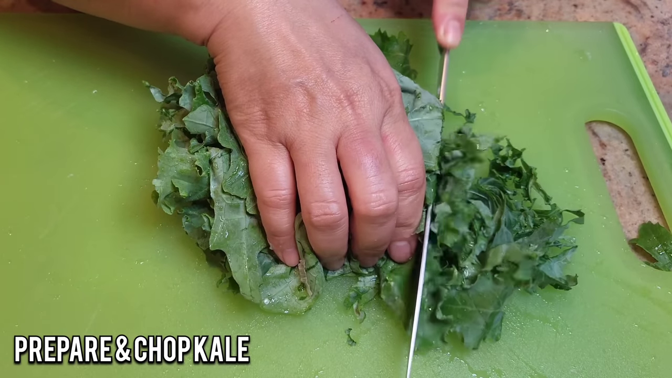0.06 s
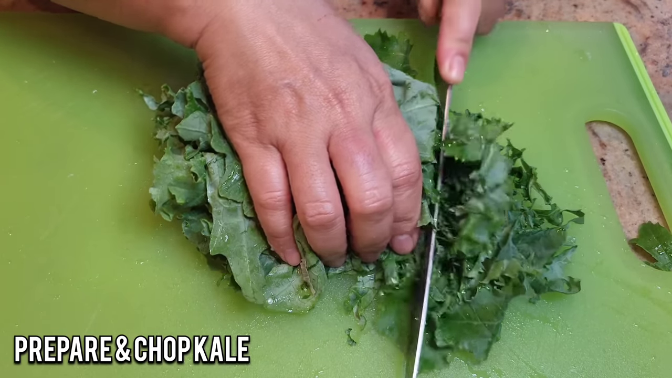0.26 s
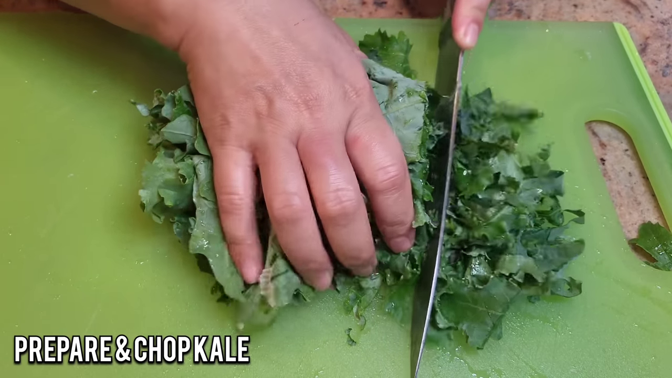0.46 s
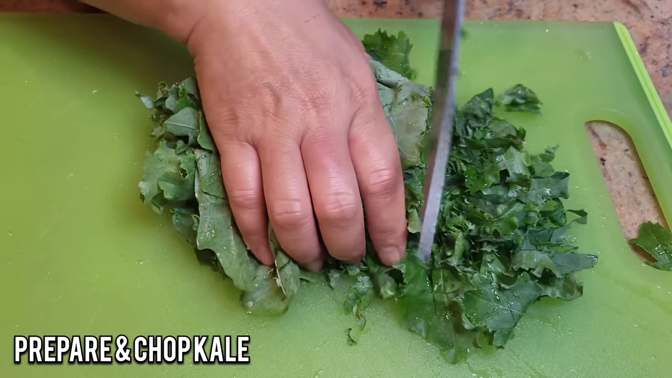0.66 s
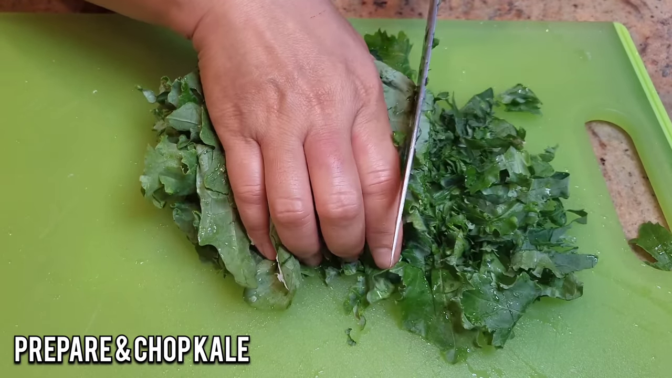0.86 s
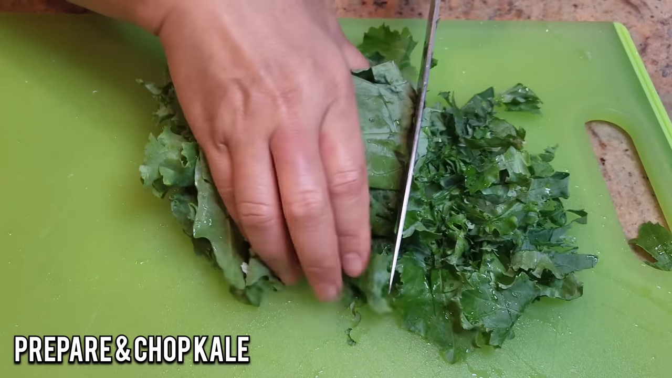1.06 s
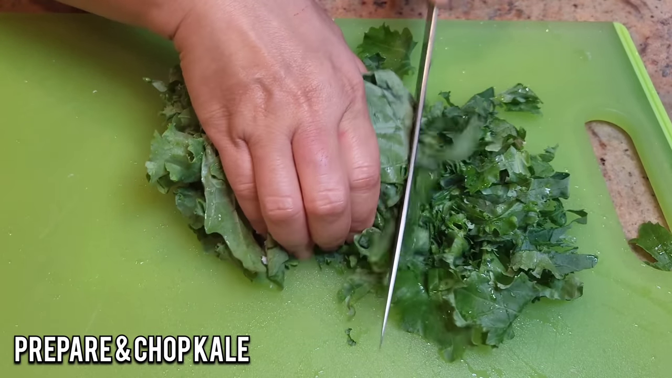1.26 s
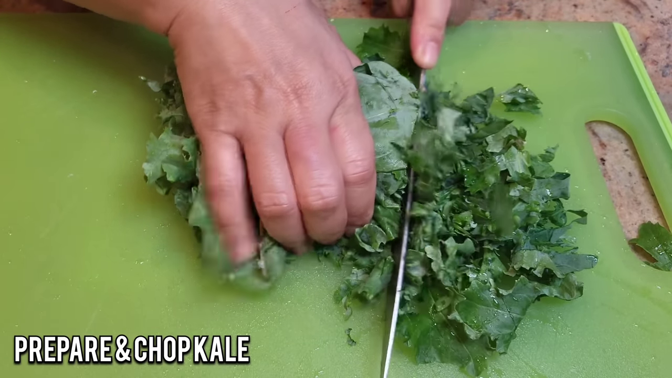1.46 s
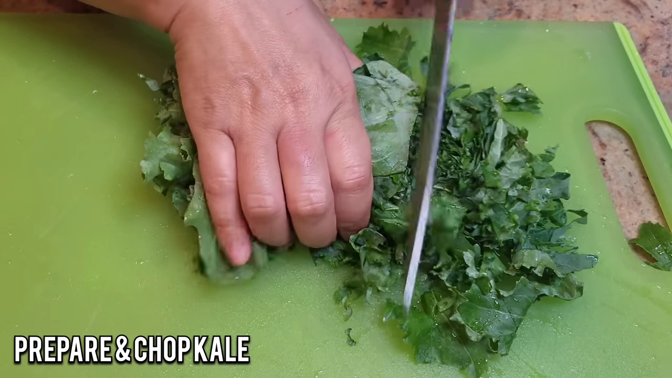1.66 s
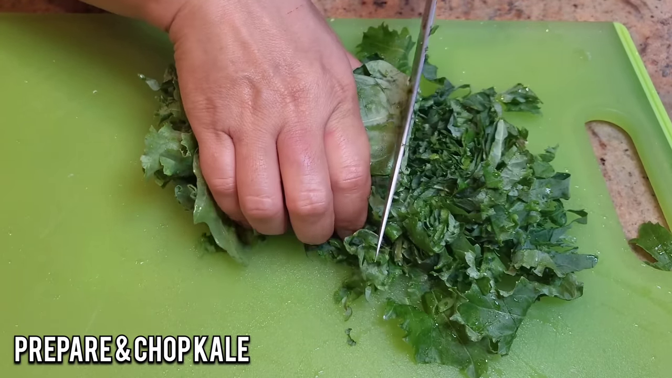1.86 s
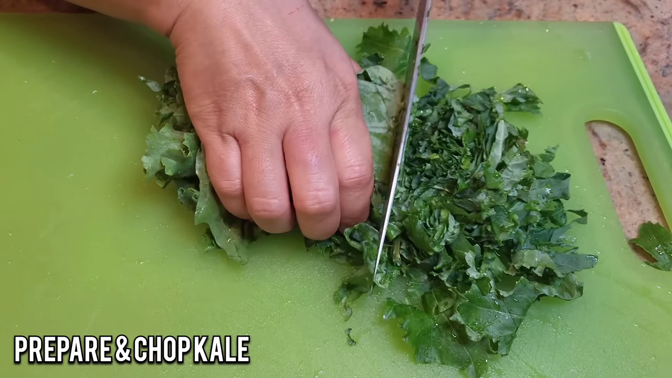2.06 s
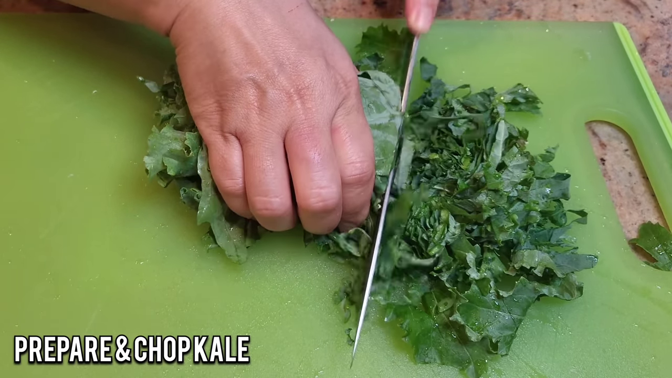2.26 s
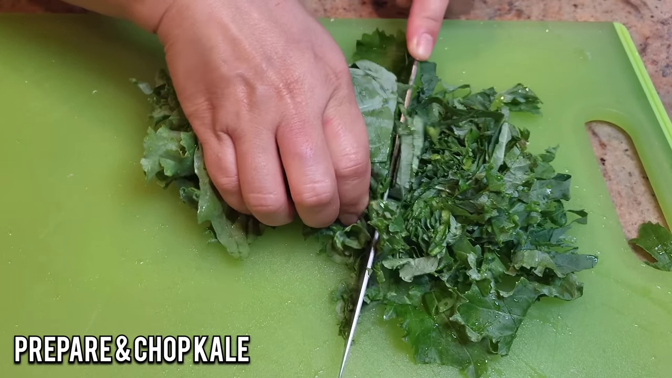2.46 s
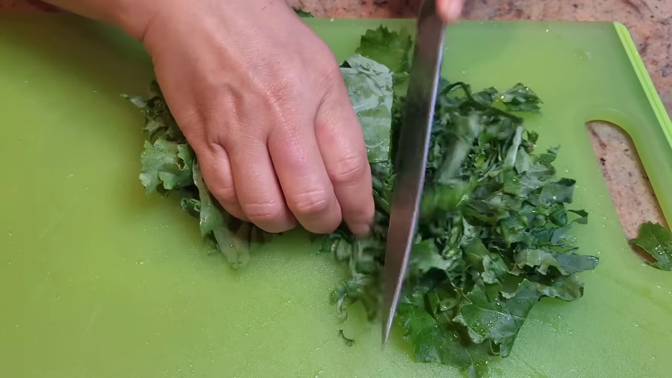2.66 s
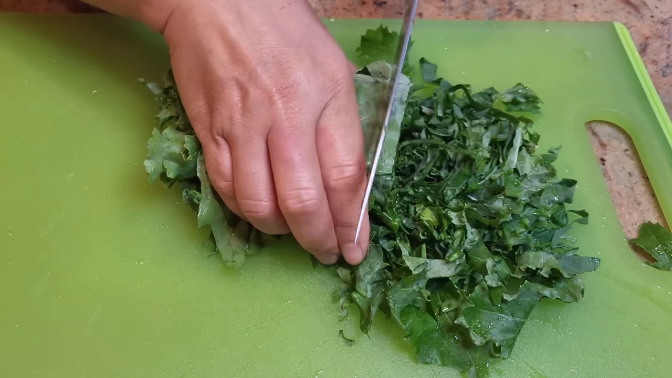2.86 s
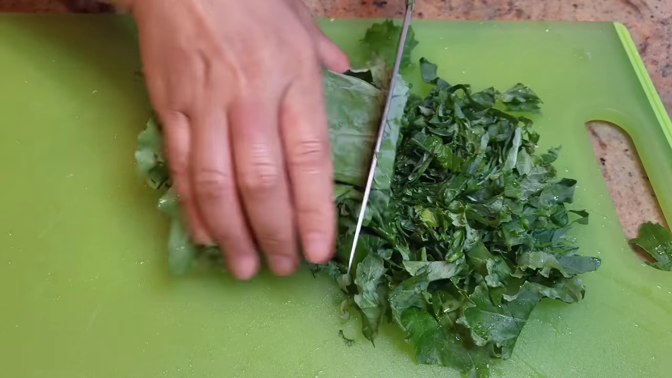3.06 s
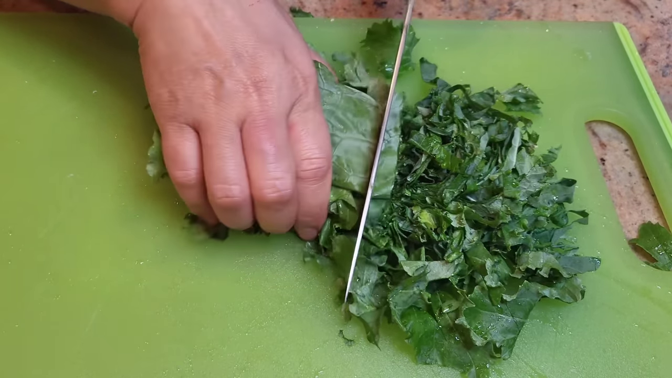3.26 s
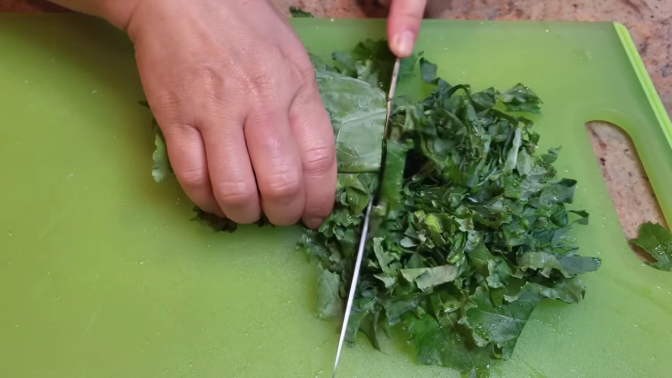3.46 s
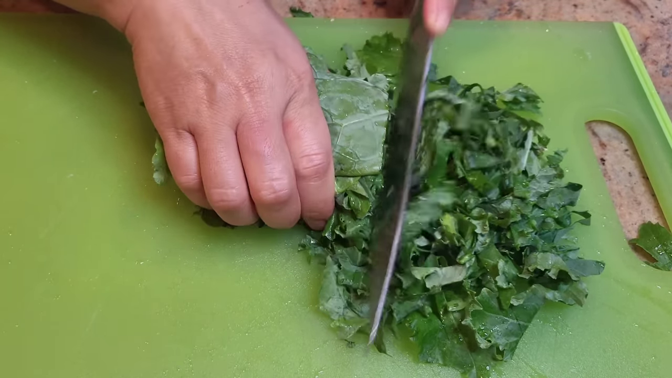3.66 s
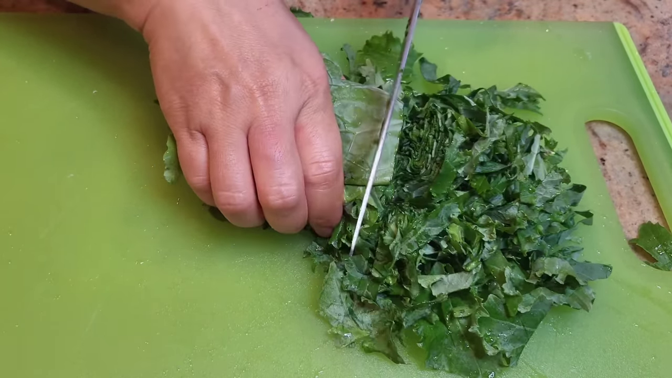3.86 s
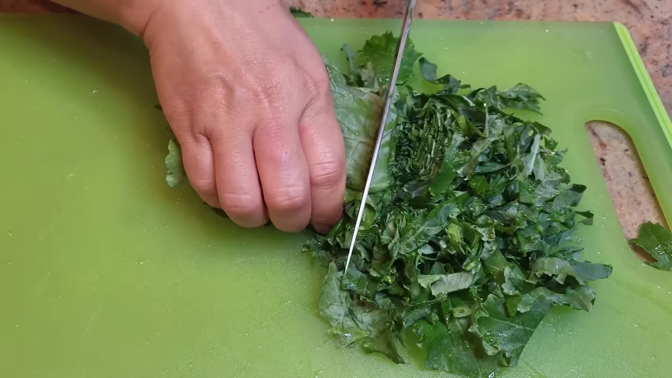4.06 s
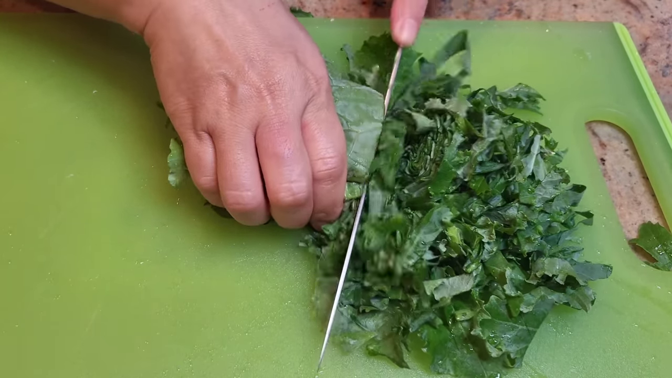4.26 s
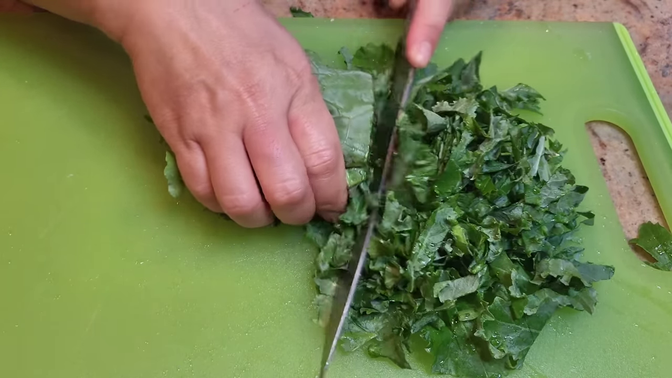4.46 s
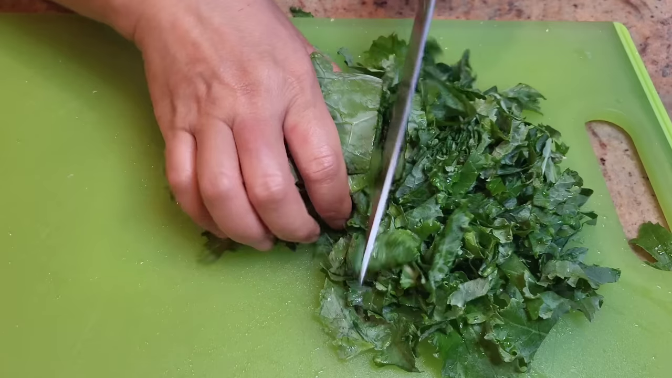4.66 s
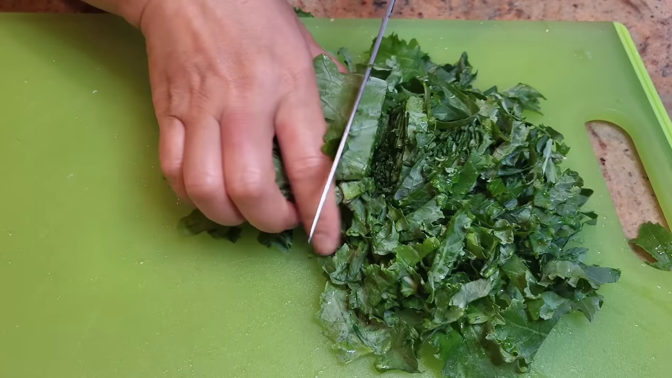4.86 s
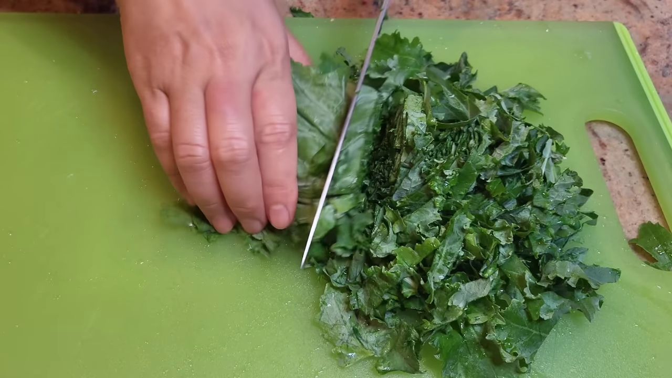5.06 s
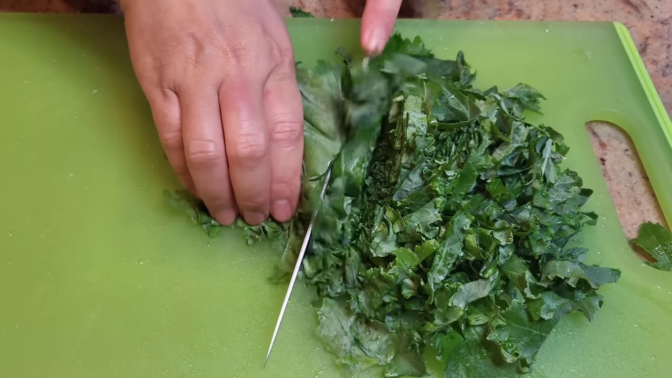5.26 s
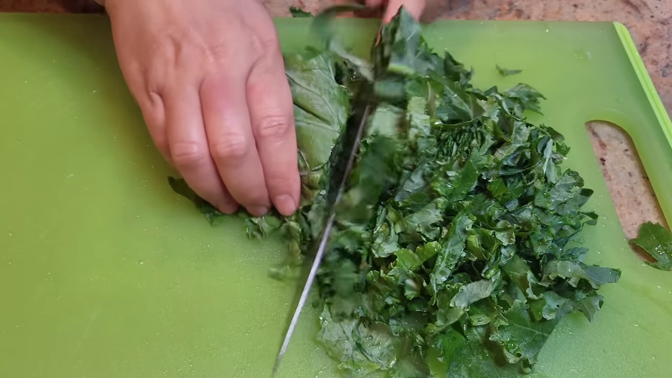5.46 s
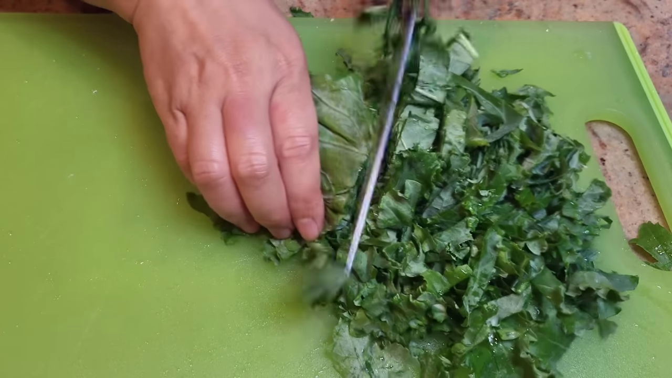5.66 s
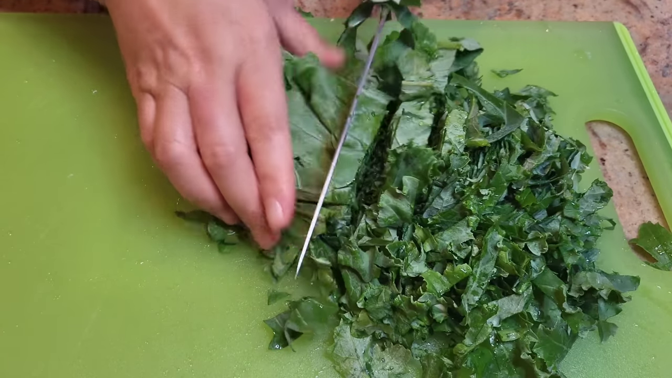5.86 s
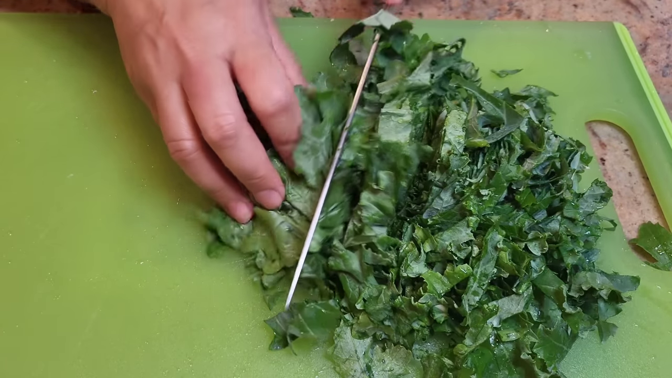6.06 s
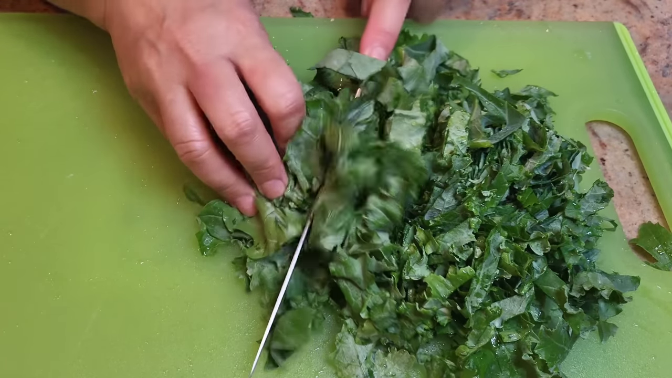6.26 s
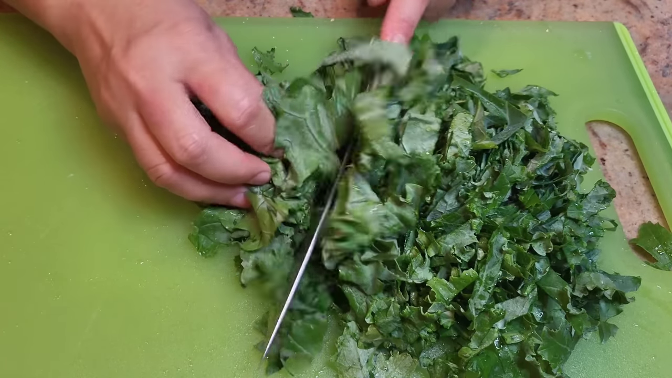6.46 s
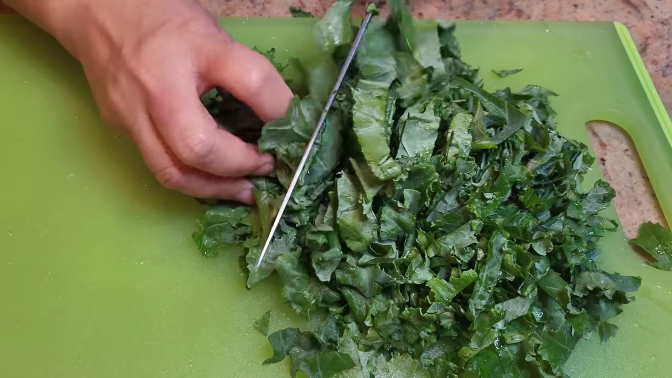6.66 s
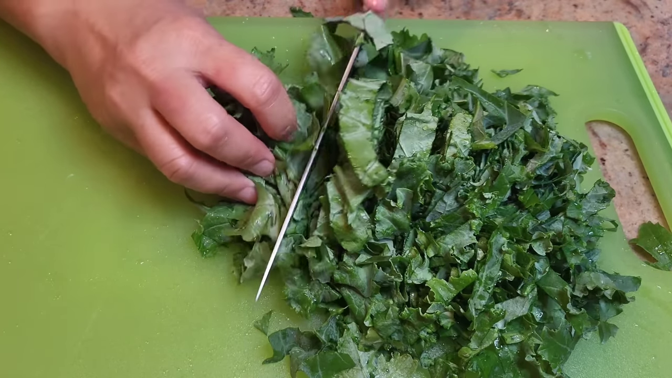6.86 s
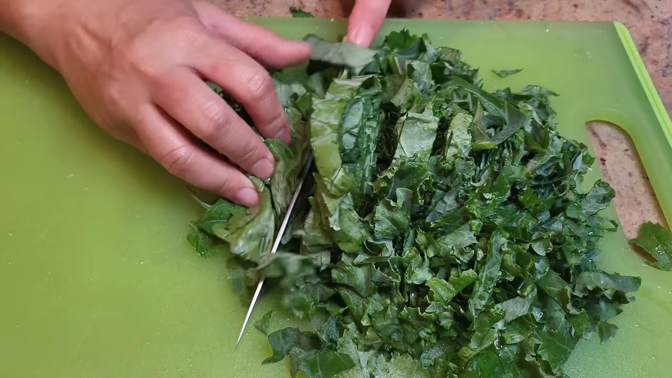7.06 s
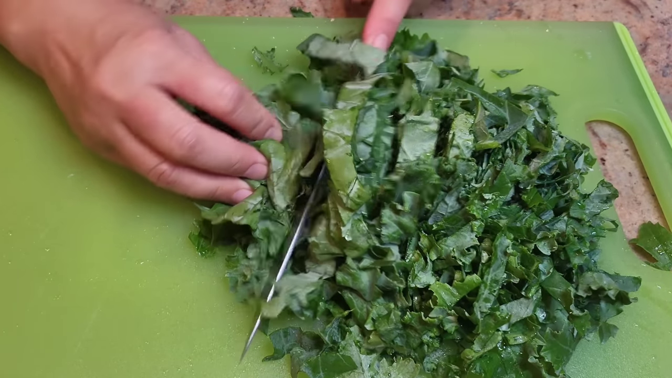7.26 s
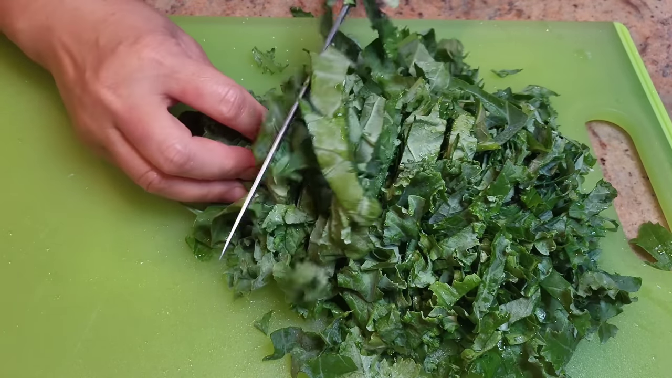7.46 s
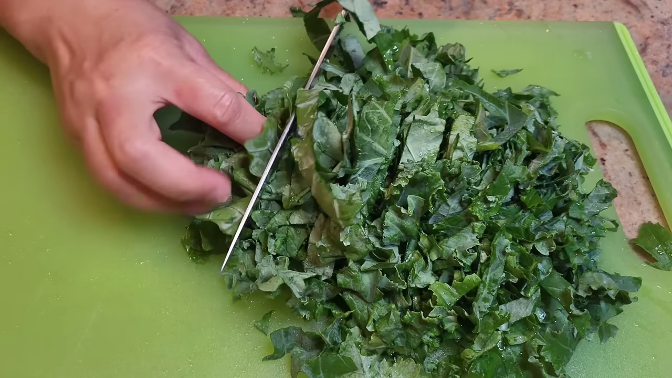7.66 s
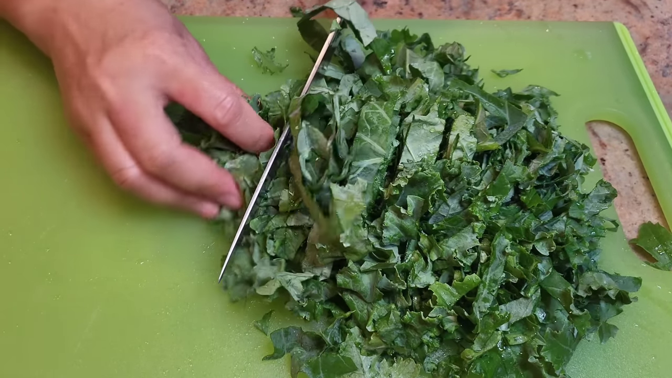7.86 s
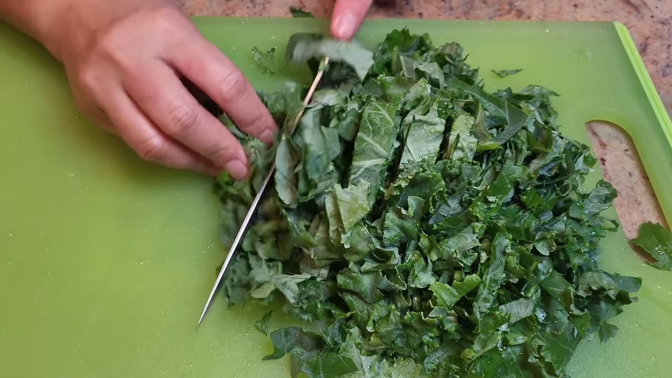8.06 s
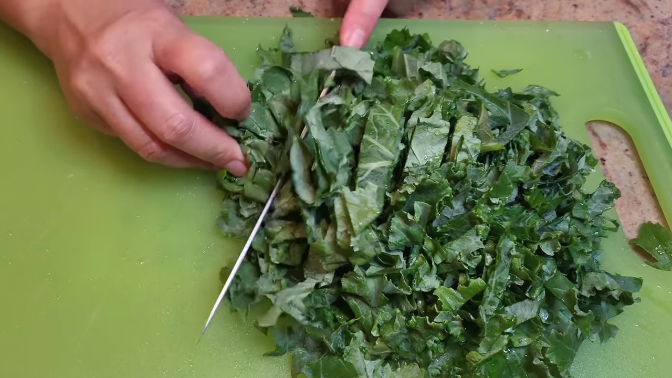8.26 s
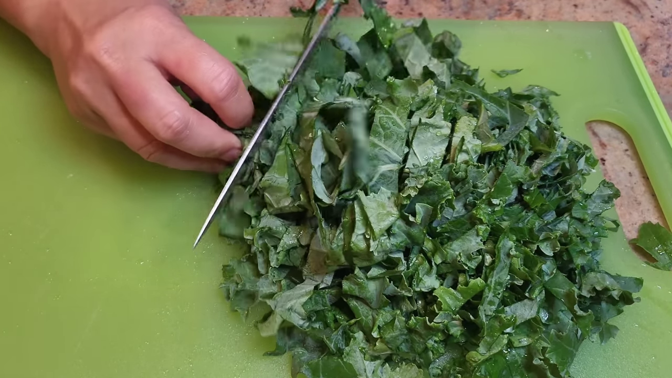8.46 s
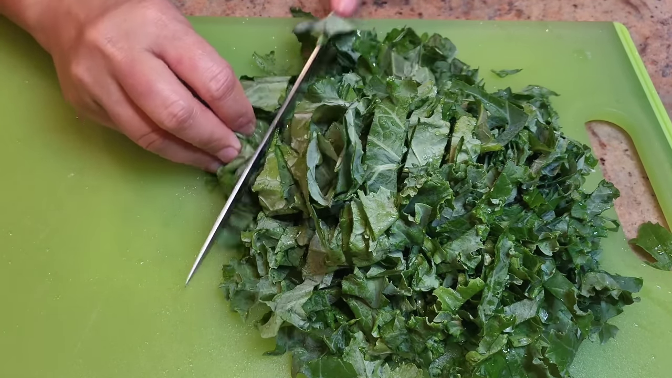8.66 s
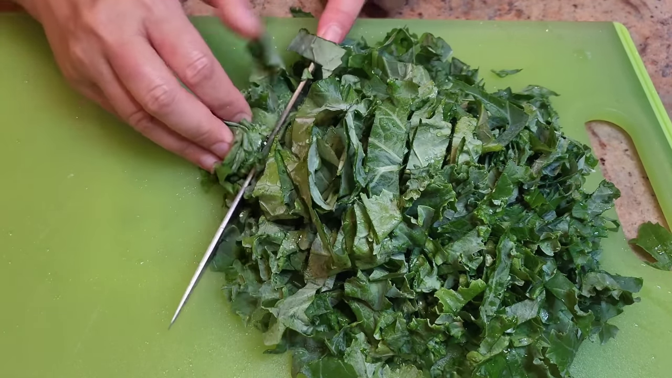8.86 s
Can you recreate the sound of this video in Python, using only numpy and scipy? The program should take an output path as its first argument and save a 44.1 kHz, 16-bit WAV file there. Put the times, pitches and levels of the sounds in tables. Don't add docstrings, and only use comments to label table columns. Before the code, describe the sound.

A large knife slices rolled leafy greens very close to a stereo microphone. Each of ten cuts swells as a crisp wet crackle with popping stems, then stops in a hard knock on a plastic board that rings briefly. Between cuts, fingers rustle the leaves and faint ticks follow. Soft low thuds come from the counter, in a small quiet kitchen with short echoes, light hiss and faint motor hum.

```python
import sys
import numpy as np
from scipy import signal
from scipy.fft import rfft, irfft, next_fast_len
from scipy.io import wavfile
from scipy.ndimage import uniform_filter1d

SR = 44100
rng = np.random.default_rng(int(sys.argv[2]) if len(sys.argv) > 2 else 0)


def field_ratio(decibels):
    return 10 ** (np.asarray(decibels, dtype=float) / 20)


def pcm_store(signal):
    levels = np.round(np.clip(np.atleast_2d(signal), -1, 1) * 32767)
    wavfile.write(sys.argv[1], SR, levels.astype(np.int16).T)


N = 392914

# (pitch_hz, level_db)
LEAF_TONE = [(600, -28), (1400, -2.5), (2200, -4.5), (5000, -6), (6500, -13.5), (9000, -27), (16000, -35)]
# (pitch_hz, level_db)
FIZZ_TONE = [(4500, -16), (6500, -1.5), (8000, -2), (11000, -3.5), (15000, -5)]
# (pitch_hz, width_hz, level_db)
BOARD_TONES = [(590, 67, 1.5), (732, 20, -4), (960, 40, -11), (980, 8, -2), (1020, 8.5, 4.5),
               (1063, 11, -4), (1105, 25, -6), (1200, 22, 2), (1370, 25, -4), (1400, 30, 0),
               (1780, 30, -4.5), (2230, 22, -5), (2895, 25, -12.5)]


def evened(x):
    return x / np.sqrt(np.mean(x ** 2) + 1e-20)


def steadied(x):
    return x / np.sqrt(uniform_filter1d((x ** 2).mean(0), 2500) + 1e-9)


def read(points, hz):
    f, value = np.transpose(points)
    return np.interp(np.log(hz + 1), np.log(f + 1), value)


def add(mix, s, sound):
    part = mix[:, round(s * SR):][:, :sound.shape[1]]
    part += sound[:, :part.shape[1]]


def ears(pan_db):
    return field_ratio(np.array([pan_db / 2, -pan_db / 2]))


def coloured(x, gains_db):
    size = next_fast_len(N)
    hz = np.fft.rfftfreq(size, 1 / SR)
    return irfft(rfft(x, size) * field_ratio(gains_db(hz)), size)[..., :N]


def leaf_colour(x, tone):
    # (pitch_hz, left_minus_right_db)
    balance = [(1000, 2.5), (3000, 0), (8000, 0.4), (14000, -4)]
    return coloured(x, lambda hz: read(tone, hz) + read(balance, hz) * [[0.5], [-0.5]])


def ring(x, modes):
    out = 0
    for k, (hz, width_hz, db) in enumerate(modes):
        r = np.exp(-np.pi * width_hz / SR)
        turn = 2 * np.pi * hz / SR
        gain = (-1) ** k * field_ratio(db) * np.sqrt(1 - r) * np.sin(turn)
        out = out + signal.lfilter([gain], [1, -2 * r * np.cos(turn), r * r], x)
    return out


def uneven(per_s, spread_db):
    size = field_ratio(spread_db * np.minimum(rng.exponential(1, N), 4))
    return size * (rng.random(N) < per_s / SR)


def air():
    # (pitch_hz, level_db_per_hz)
    hiss_tone = [(15, -59.5), (25, -10), (190, 4), (301, -3.5), (354, 3.5), (476, -8), (545, -2), (695, -3),
                 (818, -16), (911, -7.5), (1740, -25.5), (4870, -16.5), (10700, -18.5), (16000, -31.5)]
    # (pitch_hz, likeness)
    hiss_same = [(60, 0.63), (200, 0.63), (500, 0.2), (1500, 0.27), (8000, 0.067)]
    # (pitch_hz, width_hz, level_db)
    motor = [(58.7, 10, -77.5), (191, 12, -82.5), (241.7, 12, -78), (317, 25, -85), (360.4, 3, -73),
             (436, 10, -74.5), (489, 1.7, -73), (804, 9, -76.5)]
    frames, hz = N // 256 + 5, np.fft.rfftfreq(1024, 1 / SR)
    a, b, c, d, patches = rng.standard_normal((frames, 513, 5)).T
    patches = evened(uniform_filter1d(uniform_filter1d(patches, 12, 0), 8, 1))
    same = np.clip(read(hiss_same, hz), -1, 1)[:, None]
    left = a + 1j * b
    right = same * left + np.sqrt(1 - same ** 2) * (c + 1j * d)
    z = np.array([left, right]) * field_ratio(read(hiss_tone, hz)[:, None] + 3.5 * patches)
    hiss = field_ratio(-65.5) * evened(signal.istft(z, nperseg=1024, noverlap=768)[1][:, :N])
    common, apart = rng.standard_normal(N), rng.standard_normal((2, N))
    rumble = common + 0.55 * apart
    hum = sum(field_ratio(db) * steadied(ring(rumble, [(f, width, 0)])) for f, width, db in motor)
    return hiss + hum


def kitchen(x):
    # (delay_s, left_db, right_db)
    near = [(.0070, -15, -16), (0.0145, -18, -16), (0.03, -18.5, -17.5)]
    # (pitch_hz, fall_s)
    fall_times = [(100, 0.97), (500, 0.31), (2000, 0.27), (8000, 0.29), (16000, 0.26)]
    taps = np.zeros((2, SR // 2))
    at = np.arange(400, SR // 2 - 20, 20) + rng.integers(0, 20, (2, (SR // 2 - 401) // 20))
    np.put_along_axis(taps, at, rng.choice([-1., 1.], at.shape), 1)
    hz, t, z = signal.stft(taps, SR, nperseg=256)
    dying = field_ratio(-60 * t / read(fall_times, hz)[:, None])
    tail = signal.istft(z * dying, SR, nperseg=256)[1]
    tail = field_ratio(-7) * tail / np.linalg.norm(tail[0])
    for s, *dbs in near:
        tail[:, round(s * SR)] += field_ratio(np.array(dbs))
    return signal.fftconvolve(x, tail, axes=1)[:, :N]


def bumps():
    # (start_s, peak_db)
    pushes = [
        (0.019, -63),
        (1.478, -47),
        (1.599, -61),
        (4.649, -64),
        (5.599, -59),
        (6.329, -54),
        (6.549, -62),
    ]
    out, t = np.zeros((2, N)), np.arange(6000) / SR
    swell = np.e * t / 0.017 * np.exp(-t / 0.0178)
    for s, db in pushes:
        add(out, s, field_ratio(db) * swell * np.sin(2 * np.pi * 56 * t) * np.ones((2, 1)))
    return out


def rustles():
    # (start_s, length_s, level_db, pitch_hz, width_hz)
    drags = [(.468, 0.062, -43.5, 1530, 90), (3.13, 0.12, -62, 2030, 90), (6.4, 0.048, -52.5, 1900, 600),
             (2.5, 0.11, -64, 155, 63), (4.01, 0.056, -62, 1030, 200), (3.87, 0.093, -70, 1300, 410),
             (1, 0.052, -69, 1100, 500), (6.68, .05, -65, 1100, 770), (5.166, 0.024, -45, 2200, 2200),
             (7.13, 0.09, -39.5, 2500, 250), (7.058, 0.04, -43, 3400, 2500)]
    out = np.zeros((2, N))
    for s, length_s, db, hz, width_hz in drags:
        noise = rng.standard_normal((2, SR // 4))[:, :round(length_s * SR)]
        swell = np.hanning(noise.shape[1])
        add(out, s, field_ratio(db) * evened(ring(noise, [(hz, width_hz, 0)])) * swell)
    return out


def rings():
    # (start_s, level_db, pitch_hz, time_to_fall_60_db_s)
    tones = [(1.468, -50, 980, .2), (3.556, -44, 1034, 0.22), (3.556, -47, 1123, 0.35),
             (4.473, -43.5, 1031, 0.2), (5.416, -44.5, 982, 0.46), (5.416, -35, 1314, .18),
             (6.352, -34.5, 1093, 0.34), (6.352, -40, 723, .16), (7.209, -32, 985, .26),
             (7.21, -29.5, 1068, 0.33), (7.21, -39, 1810, .15), (8.222, -38.5, 1040, 0.24),
             (8.203, -44, 1464, .15), (8.851, -39, 1050, .2)]
    out, t = np.zeros((2, N)), np.arange(SR // 2) / SR
    lag = 1.1 * np.array([[0], [1]])
    for s, db, hz, t60_s in tones:
        slow = uniform_filter1d(uniform_filter1d(rng.standard_normal(len(t)), size=500), size=500)
        shake_db = 5 * evened(slow)
        tone = np.sin(2 * np.pi * hz * t - lag) * ears(3.0)[:, None]
        rise = 1 - np.exp(-t / 0.004)
        add(out, s, rise * field_ratio(db - 60 * t / t60_s + shake_db) * tone)
    return out


def knocks():
    # (start_s, peak_db, pitch_hz, pan_db)
    stem_breaks = [(0.0883, -29, 930, -3), (0.137, -28.5, 1040, -3), (0.1461, -28, 980, 2),
                   (0.188, -34, 1190, 3), (0.204, -31, 1250, 3), (0.286, -30, 960, 1),
                   (1.2939, -30.5, 990, 4), (1.311, -27.5, 1030, -5), (1.3162, -39, 1050, 2),
                   (1.3297, -25, 1120, 0), (1.3338, -30, 1070, 4), (1.358, -30, 1450, 6),
                   (1.368, -28, 1450, 0), (1.430, -25, 1200, 3), (1.449, -26, 1430, 3),
                   (2.214, -25, 960, 0), (2.28, -32, 1013, -1), (2.301, -29, 1044, 7),
                   (2.3077, -37, 1040, -3), (2.350, -25.5, 1000, -8), (2.4169, -26, 1000, 3),
                   (2.51, -40, 1070, -8), (3.374, -33, 1090, -2), (3.3793, -24, 970, -1),
                   (3.395, -30, 1086, 3), (3.444, -25, 1250, 8), (4.131, -45, 800, 1),
                   (4.238, -26, 990, -4), (4.313, -22, 1300, 7), (4.3575, -28, 993, 2),
                   (5.2525, -31.5, 1000, -5), (5.332, -23.5, 1310, 2), (5.353, -26, 1500, 2),
                   (5.389, -26, 1400, 4), (5.402, -22, 1490, 2), (3.468, -20, 1700, 0),
                   (6.335, -20, 1250, -2), (7.169, -28, 1105, 6.5), (7.191, -23, 1030, -5),
                   (7.2358, -18, 1090, -6), (7.3625, -31, 1060, -2), (3.5405, -26, 1090, -6),
                   (3.524, -26, 1010, 3), (6.373, -29, 1370, 1), (8.178, -27, 1060, 2.5),
                   (8.836, -20.5, 1060, 11),
                   (.3073, -28, 1000, 5), (.9819, -60, 1300, 0), (1.397, -25, 1400, 2),
                 (2.1477, -61, 1200, 0), (2.2437, -31, 1100, 9), (3.2929, -48, 1200, 0),
                 (3.3012, -42, 1000, 0), (3.517, -25, 1200, 2), (3.6387, -45, 1100, 2),
                 (4.4145, -25, 1200, 6), (4.5303, -39, 1200, 2), (4.9688, -59, 1200, 0),
                 (5.3006, -29, 1400, 2), (5.8598, -56, 1200, 1), (6.2602, -33, 1400, 3),
                 (6.6578, -51, 1200, 0), (6.6886, -50, 900, 0), (7.3615, -36, 1700, 0.5),
                 (8.158, -32, 906, 2), (8.188, -27, 1050, 2), (8.812, -25, 1050, 3), (8.863, -27, 1050, 3),
                 (8.685, -52, 1900, 0), (7.6908, -61, 1500, 0)]
    # (start_s, peak_db, pitch_hz, pan_db, contact_ms)
    landings = [(0.315, -31, 1000, -6, 1.7), (1.0996, -35.5, 1090, -1, 0.51), (1.466, -25, 910, -3, 0.62),
                (3.554, -18, 1060, 1, 0.95), (4.471, -26, 1060, 1, 0.98), (5.4137, -30, 607, 2, 1.5),
                (5.4141, -13, 960, -2, 0.74), (6.3500, -11, 1177, 4.5, 0.81), (6.3492, -26, 603, -2, 2.1),
                (6.3497, -17, 823, 0, 1.5), (6.3509, -7.5, 1810, -1.5, 0.35), (7.2079, -7, 1034, 6, 1.03),
                (8.2015, -31.5, 606, -2, 3), (8.202, -18.5, 1030, 3, 1.44), (8.8498, -28, 590, -1, 2.1),
                (8.850, -16, 1020, 2, 1.36), (8.8502, -23.5, 1920, 4, 1.3)]
    stem_contact_ms, stem_ring_db, edge_ring_db = 0.62, -24.5, -39.5
    bounce_s, bounce_db, bounce_pitch = 0.00674, -5, 1.06

    rows = [(*row, stem_contact_ms, stem_ring_db) for row in stem_breaks]
    rows += [(*row, edge_ring_db) for row in landings]
    for s, db, hz, *rest in landings:
        rows.append((s + bounce_s, db + bounce_db, bounce_pitch * hz, *rest, edge_ring_db))

    blow, drive, t = np.zeros((2, N)), np.zeros((2, N)), np.arange(800) / SR
    late = np.maximum(t - np.array([[0], [0.00015]]), 0)
    for s, db, hz, pan_db, contact_ms, ring_db in rows:
        lead = contact_ms / 2000
        u = 1000 * late / (contact_ms * np.array([[1.7], [1.3]]))
        swell = (np.e * u * np.exp(-u)) ** 2
        hit = field_ratio(db) * ears(pan_db)[:, None] * swell * np.sin(2 * np.pi * hz * (late - lead))
        add(blow, s - lead, hit)
        add(drive, s - lead, field_ratio(ring_db) * hit)
    return blow + ring(drive, BOARD_TONES) * ears(2.6)[:, None]


def snaps():
    # (start_s, peak_db, top_end_db)
    crisp = [(0.0082, -21, -16), (0.057, -15, -10), (0.1465, -23, -3), (0.2035, -23, -14),
             (0.216, -24, -11), (0.2543, -27, 3), (0.2872, -23, -1), (0.4853, -29, -22),
             (1.0982, -24.5, -6), (1.286, -30, -9), (1.2941, -28, -16), (1.3071, -41, -13),
             (1.3288, -19, -12), (1.418, -13, -2), (2.2116, -20, -7), (2.2811, -27, -11), (2.3054, -15, -5),
             (2.433, -25, -6), (2.4656, -13.5, -8), (2.6127, -24.5, -14), (3.335, -22.5, -24),
             (3.4695, -19, -13), (3.4873, -19, -14), (4.131, -24.5, -5), (4.1926, -36, 8), (4.2401, -26, 6),
             (4.2807, -18, -29), (4.326, -8.5, -37), (4.4721, -16, -18), (5.0867, -27, 0),
             (5.1446, -33.5, 11.5), (5.176, -29, -8), (5.2019, -33, 5.5), (5.2158, -42, -19),
             (5.2533, -27, 1), (5.2814, -29, 11), (6.1633, -23.5, -11), (6.185, -29.5, -3.5),
             (6.2193, -24.5, -24), (6.2266, -19, -16), (6.2595, -13.5, -13), (6.35, -11, -36.5),
             (7.1112, -18, -14.5), (7.1492, -13, -21), (7.2075, -19, -23), (7.3605, -27, -17),
             (8.0288, -37, 11), (8.148, -14, -18), (8.7717, -20, -3), (8.8516, -19, -29)]
    # (start_s, peak_db, top_end_db)
    more_snaps = [(0.768, -45, -14), (0.8908, -53, -13), (1.0522, -50, 5), (1.2157, -33.5, -3),
                  (1.2726, -38, -14), (1.7417, -45, -16), (1.7581, -49, -20), (1.7908, -54, 9),
                  (1.8109, -42, -17), (1.8486, -41, 4), (2.1379, -52, 10), (2.5782, -38, -22), (2.6644, -47, 2),
                  (2.7078, -46, -21), (2.7274, -42.5, -6), (2.7787, -51, 7), (2.8845, -57, 5),
                  (3.008, -44.5, -6), (3.0502, -54, 2), (3.2993, -38, -5), (3.3144, -31, -20),
                  (3.6522, -36, -22), (3.718, -40, -11), (3.81, -48, -9), (4.0415, -52.5, 6), (4.1058, -54, -5),
                  (4.5292, -35, -14), (4.6061, -51, 7), (4.8675, -44, -26), (5.0546, -45, -10),
                  (5.6046, -46, -7), (5.7125, -47, -2), (8.35, -38.5, 0), (5.8604, -46, 1), (6.02, -52.5, 14),
                  (6.5092, -34, -23), (6.5666, -33, -18), (6.6565, -39, -13), (6.6877, -39, -21),
                  (6.7548, -45.5, -2), (6.8318, -35, -16), (6.9187, -44.5, 4), (6.936, -39.5, 4),
                  (7.0172, -52, -1), (7.3187, -26, -24), (7.5842, -54.5, 3), (7.6512, -51, -6),
                  (7.8361, -49, -8), (6.886, -49, 7), (7.966, -38, 5), (8.2936, -41, 3), (6.278, -19, -2),
                  (8.5943, -55, -6), (8.6039, -51, 16.5), (8.6435, -52.5, 15), (8.6854, -43, 8),
                  (8.7073, -33.5, -10), (8.7267, -39, -3)]
    body, top, t = np.zeros((2, N)), np.zeros((2, N)), np.arange(1200) / SR
    shape = 0.55 * np.exp(-t / 0.0009) + 0.08 * np.exp(-t / 0.009)
    for s, db, top_db in [*crisp, *more_snaps]:
        a, b, c = rng.standard_normal((3, len(t)))
        click = np.arange(len(t)) == rng.integers(0, 4, size=(2, 1))
        noise = 0.5 * a + 1.28 * np.array([b, c])
        burst = field_ratio(db + 0.5) * (1.5 * click + shape * noise)
        add(body, s, burst)
        add(top, s, field_ratio(top_db + 0.5) * burst)
    return leaf_colour(body, LEAF_TONE) + leaf_colour(top, FIZZ_TONE)


def crackle(per_s, spread_db, burst_s, same):
    power = signal.lfilter([1], [1, -np.exp(-2 / (burst_s * SR))], uneven(per_s, spread_db) ** 2)
    a, b = rng.standard_normal((2, N))
    same = np.clip(same, 0, 1)
    return steadied(np.sqrt(power) * [a, same * a + np.sqrt(1 - same ** 2) * b])


def patchy(x, depth_db):
    z = signal.stft(x, nperseg=256)[2]
    field = uniform_filter1d(uniform_filter1d(rng.standard_normal(z.shape[1:]), 5, 0), 9, 1)
    return signal.istft(z * field_ratio(depth_db * evened(field)), nperseg=256)[1][:, :N]


def pops(cycles, apart):
    # (pitch_hz, level_db)
    stem_tone = [(350, -15), (600, -11), (1000, -4.5), (1500, -4), (2600, -10)]
    hz, t = np.geomspace(380, 2600, num=16)[:, None, None], np.arange(700) / SR
    phase = apart * (hz / 1000) ** 2 * rng.choice([-1, 1], (16, 1, 1)) * [[0.5], [-0.5]]
    u = t * hz / cycles
    shapes = field_ratio(read(stem_tone, hz)) * np.sqrt(hz) * u * np.exp(-u) * np.sin(2 * np.pi * hz * t + phase)
    size, kind = uneven(1500, 1.92), rng.integers(0, 16, N)
    out = np.zeros((2, N))
    for k, shape in enumerate(shapes):
        out += signal.oaconvolve((size * (kind == k))[None], shape, axes=1)[:, :N]
    return steadied(out)


def effort():
    # (bite_s, bite_db, rise_to_full_push_s, full_db, hold_until_landing_s)
    cuts = [
        (.234, -51, 0.059, -37.5, 0.019),
        (1.287, -51, 0.14, -33.5, 0.038),
        (2.207, -45, 0.13, -39, 0.12),
        (3.371, -44.5, 0.11, -34.5, 0.065),
        (4.188, -51.5, 0.087, -35, 0.17),
        (5.246, -52, 0.083, -32.5, 0.091),
        (6.217, -57.5, 0.12, -28.5, 0.015),
        (7.085, -51.5, 0.11, -30.5, 0.0095),
        (8.098, -51, 0.088, -32, 0.008),
        (8.72, -62.5, 0.078, -34.5, 0.056),
    ]
    # (fizz_db, crunch_db, thud_db)
    bottoms = [
        (-3.5, 1, -3),
        (-2, 4.5, -3.5),
        (-3, 6, -2.5),
        (-6.5, 1.5, -5.5),
        (-8.5, 0.5, -7),
        (-7.5, -2, -6.5),
        (-10, -3.5, -9),
        (-12.5, 2, -4),
        (-8.5, -3, -7),
        (-11.5, 0, -5.5),
    ]
    # (touch_s, touch_db, length_s, end_db)
    presses = [(0, -45.5, 0.22, -45), (1.188, -65.5, 0.1, -54), (2.114, -79, 0.11, -63.5),
               (3.243, -69.5, 0.09, -54), (3.351, -55, 0.03, -39), (4.13, -85, 0.055, -60.5),
               (5.066, -60.5, 0.06, -63), (5.133, -61, 0.071, -51), (5.229, -82, 0.019, -42.5),
               (6.158, -55.5, 0.065, -55), (6.277, -41, .03, -42.5), (7.045, -68, 0.026, -48),
               (7.942, -68.5, 0.17, -51.5), (8.601, -82, 0.12, -65.5)]
    # (peak_s, peak_db, rise_s, fall_s), times for 20 dB
    shuffles = [(0.486, -49, 0.07, 0.083), (.535, -53, .08, 0.096), (.66, -76, .15, .4),
                (.92, -81, 0.092, 0.3), (2.9, -74, .15, 0.11), (7.8, -81, .2, .1), (3.98, -84, .2, 0.22),
                (1.086, -60.5, 0.078, 0.027), (1.095, -54, 0.0044, 0.11), (1.859, -65, 0.24, 0.17),
                (2.53, -62, .05, 0.36), (2.775, -64.5, 0.099, .05), (3.2, -60.5, 0.16, 0.085),
                (3.01, -71, .03, 0.074), (1.055, -62.5, 0.027, .1), (3.8, -77, 0.22, 0.36),
                (4.57, -61.5, 0.13, 0.16), (4.757, -66.5, 0.27, 0.11), (5.05, -68, 0.25, 0.15),
                (5.648, -63.5, .3, 0.37), (5.76, -68, 0.22, 0.076), (5.94, -66.5, 0.12, 0.47),
                (6.155, -59.5, 0.047, 0.023), (6.68, -65.5, 0.33, 0.062), (6.828, -62.5, 0.035, 0.83),
                (7.4, -60, 0.073, 0.072), (7.653, -69, 0.0047, 0.26), (8.42, -63, 0.12, 0.13)]
    # crackle, fizz, crunch, thud in dB
    at_bite, pressed, shuffled = (0, 2, -2.5, -5.5), (0, -1.5, -3.5, -12), (0, -5.5, -3, -6)
    at_rest_db = np.array((-94, -88, -88.5, -79))
    release_db_per_s = (289.7, 336, 264, 210)
    sag_db_per_s = 26.5
    settle_db, settle_db_per_s = -23.5, 76

    t = np.arange(0, N / SR + 0.01, 1 / 1000)
    power = field_ratio(at_rest_db)[:, None] ** 2 + 0 * t
    for (bite, bite_db, rise, full_db, hold), bottom in zip(cuts, bottoms):
        full, land = bite + rise, bite + rise + hold
        since = np.maximum(t - land, 0)
        land_db = full_db - sag_db_per_s * (land - full)
        fall = field_ratio(-np.outer(release_db_per_s, since)) ** 2
        fall = fall + field_ratio(settle_db - settle_db_per_s * since) ** 2
        depth = np.clip((t - bite) / (land - bite), 0, 1)
        layers_db = np.outer(at_bite, 1 - depth) + np.outer((0, *bottom), depth)
        push_db = np.interp(t, [bite, full, land], [bite_db, full_db, land_db])
        start = np.clip((t - bite) / 0.007, 0, 1) ** 2
        power = power + start * fall * field_ratio(push_db + layers_db) ** 2
    for touch, touch_db, length, end_db in presses:
        end = touch + length
        db = np.interp(t, [touch, end], [touch_db, end_db])
        db = db - np.outer(release_db_per_s, np.maximum(t - end, 0))
        power = power + (t >= touch) * field_ratio(db + np.array(pressed)[:, None]) ** 2
    for s, db, rise, fall in shuffles:
        swell_db = db - 20 * np.maximum((s - t) / rise, (t - s) / fall)
        power = power + field_ratio(swell_db + np.array(shuffled)[:, None]) ** 2
    return [np.interp(np.arange(N) / SR, t, np.sqrt(p)) for p in power]


def slicing():
    # (pitch_hz, width_hz, level_db)
    counter_tones = [(57.7, 28.8, -10.5), (126.8, 20, -2), (182.2, 24, 1), (202.5, 22, 1.5),
                     (262.4, 44, -3), (376, 38, -8)]
    # (pitch_hz, width_hz, level_db)
    rocking_tones = [(299, 130, -9)]
    leaf, fizz, stem, thud = effort()
    cells = patchy(crackle(per_s=3200, spread_db=2.1, burst_s=0.0011, same=0.16), depth_db=2.1)
    leaves = leaf * evened(leaf_colour(cells, LEAF_TONE))
    leaves = leaves + field_ratio(2.0) * fizz * evened(leaf_colour(cells, FIZZ_TONE))
    stem = np.minimum(stem, field_ratio(4) * leaf)
    stems = stem * evened(pops(cycles=1.16, apart=1.24)) * ears(2.0)[:, None]
    board = field_ratio(-35.5) * ring(stems, BOARD_TONES)
    push = crackle(per_s=400, spread_db=3.3, burst_s=0.0011, same=1.0)
    rocking = evened(ring(push[0, ::-1], rocking_tones)) * [[1], [-1]]
    counter = evened(ring(push, counter_tones)) + field_ratio(-16) * rocking
    return field_ratio(2.0) * (leaves + stems + board), field_ratio(-1.0) * thud * counter


def scene():
    cut, thud = slicing()
    clicks, blows, drags = snaps(), knocks(), rustles()
    echoes = kitchen(clicks + drags + field_ratio(-2.5) * blows + field_ratio(-3.0) * cut)
    return cut + thud + clicks + blows + drags + bumps() + echoes + air() + rings()


def roll_off(x):
    return signal.sosfilt(signal.butter(12, 17010, fs=SR, output="sos"), x)


def record(dry):
    bass_cut = signal.butter(2, 36, "high", fs=SR, output="sos")
    clean = signal.sosfilt(bass_cut, dry)
    band = signal.firwin(1023, 15880, window=("kaiser", 9), fs=SR)
    mix = signal.oaconvolve(clean, band[None], "same", axes=1)
    return roll_off(mix)


dry = scene()
out = record(dry)
pcm_store(out)
```